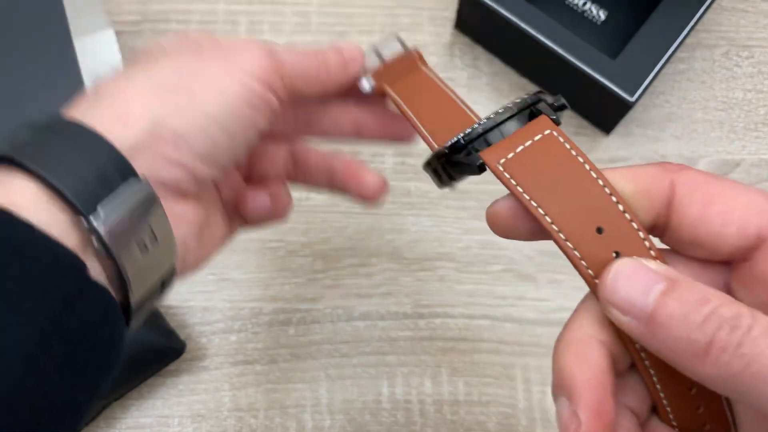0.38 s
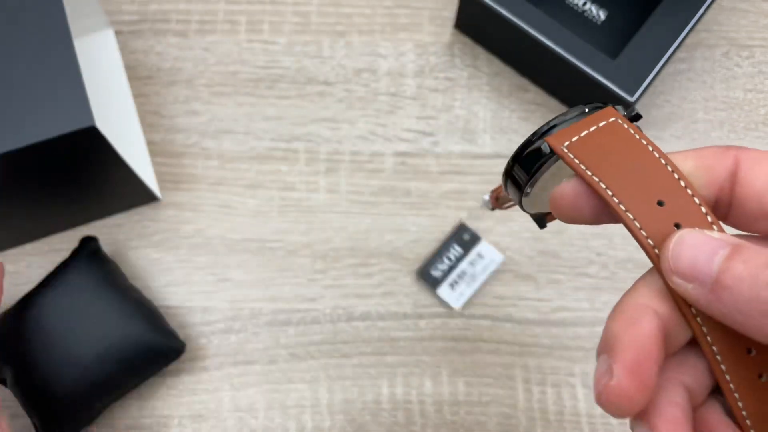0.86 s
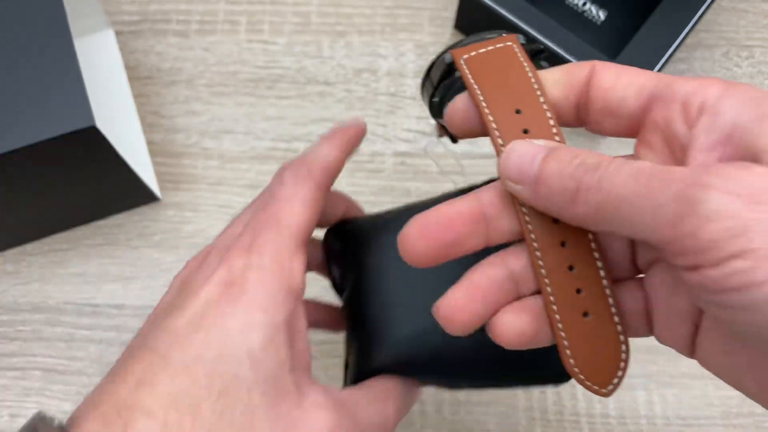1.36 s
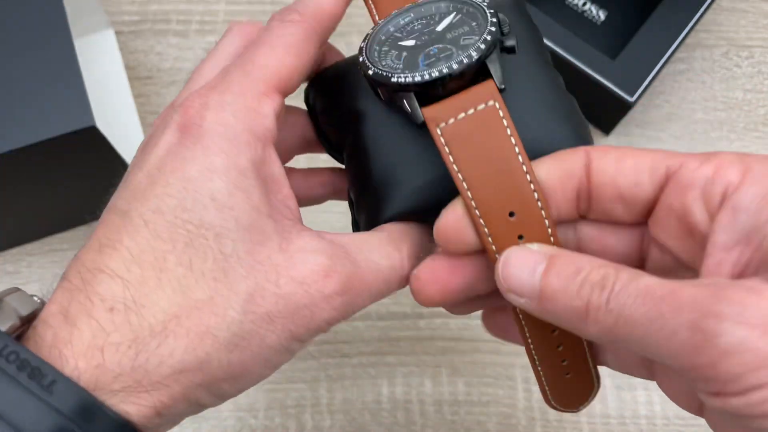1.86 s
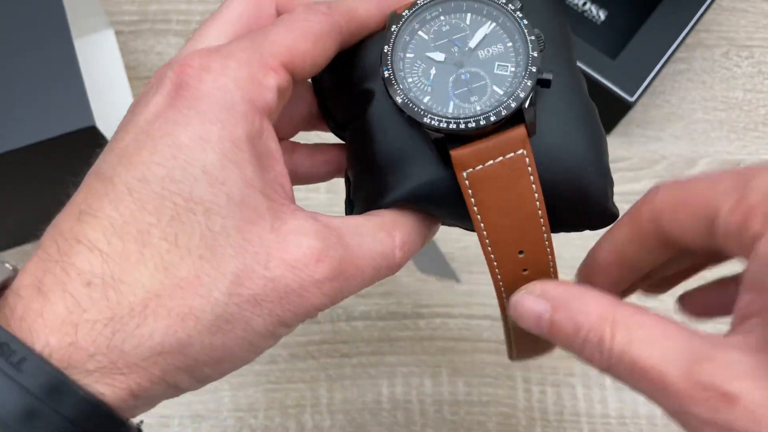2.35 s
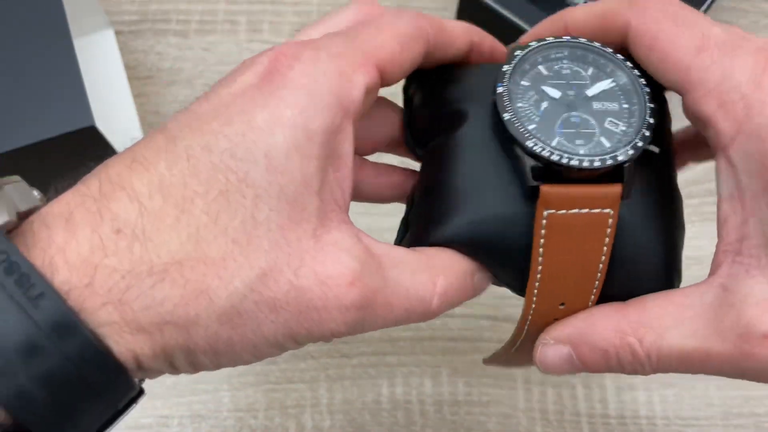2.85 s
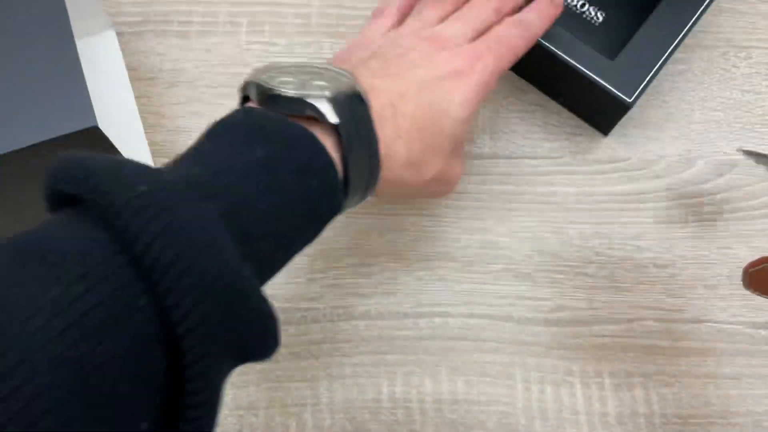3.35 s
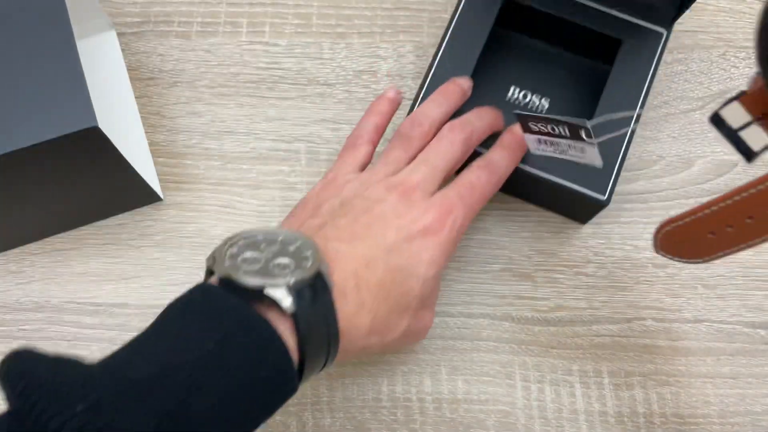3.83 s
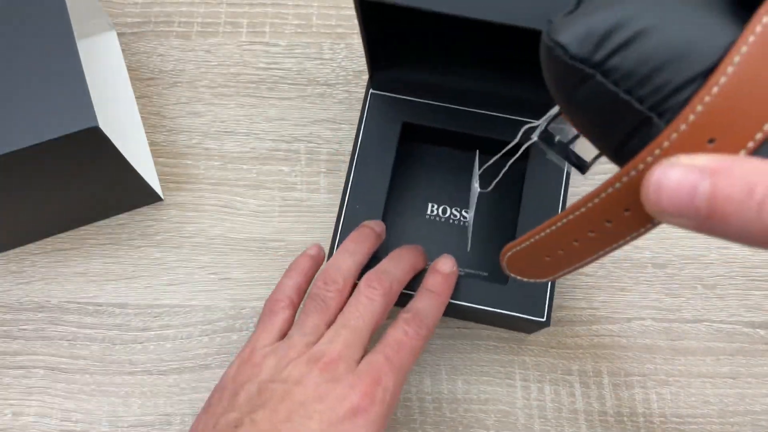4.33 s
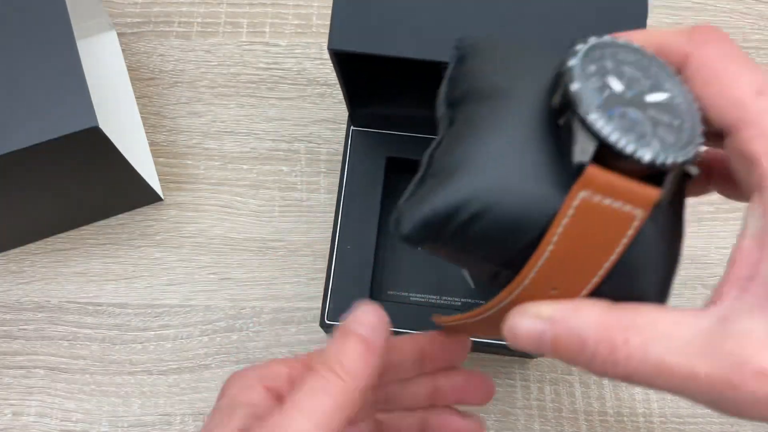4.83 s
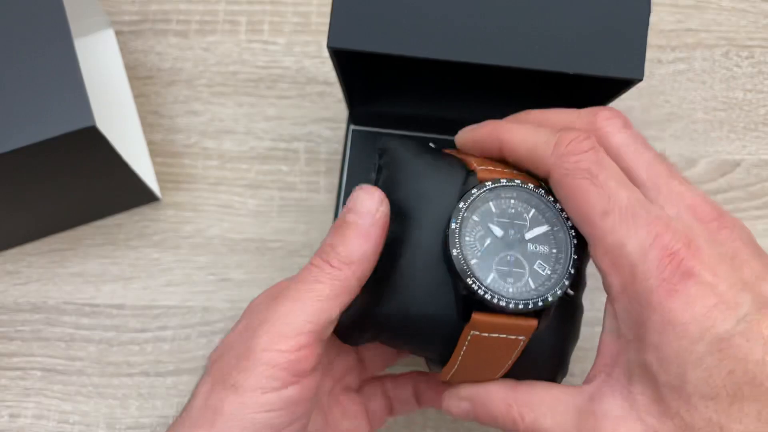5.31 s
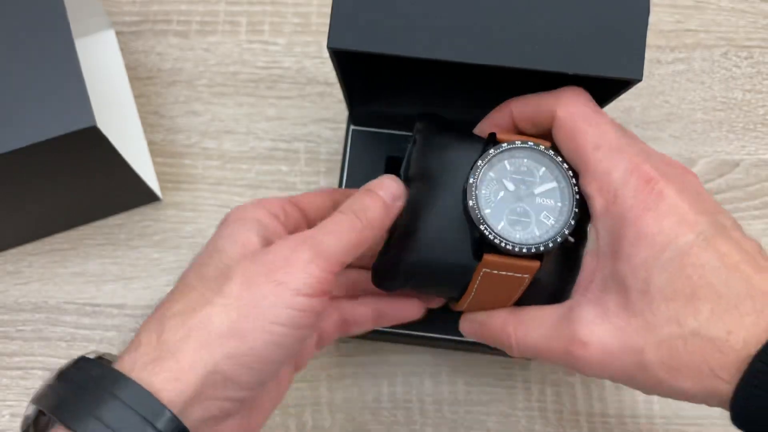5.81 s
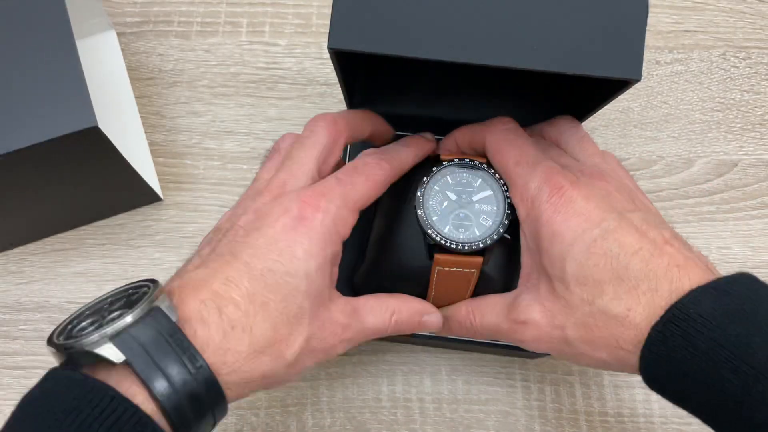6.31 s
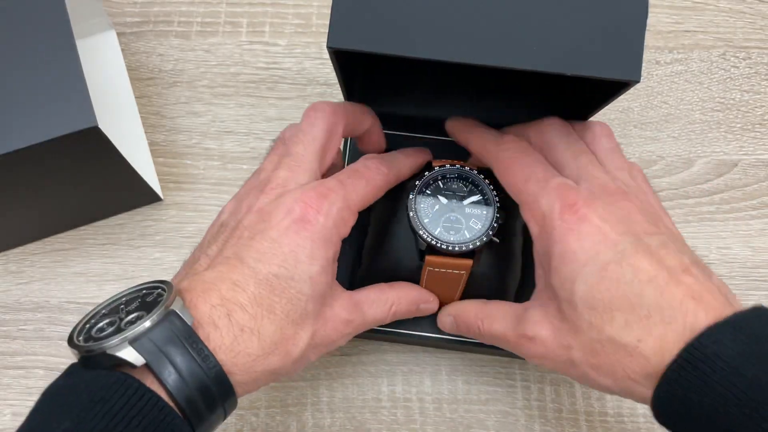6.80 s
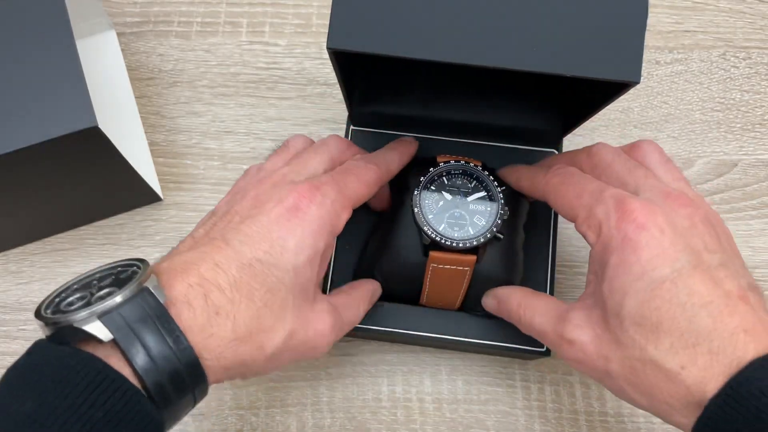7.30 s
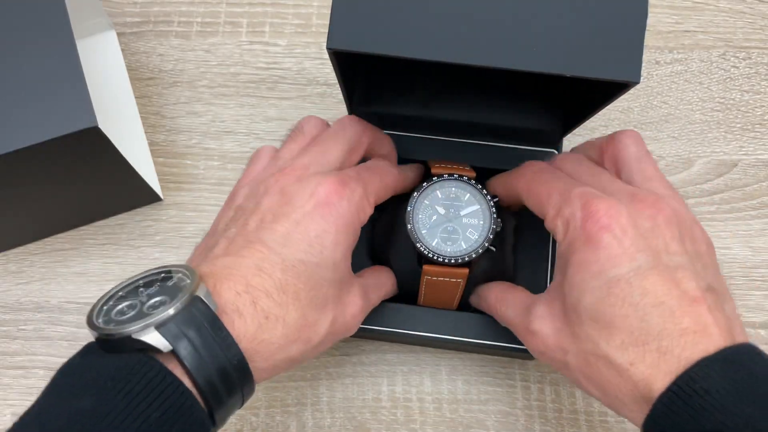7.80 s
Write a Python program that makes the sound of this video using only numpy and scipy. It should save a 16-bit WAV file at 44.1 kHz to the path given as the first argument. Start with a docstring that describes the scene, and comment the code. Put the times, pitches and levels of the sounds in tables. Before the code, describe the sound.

Hands rub a leather strap around a cushion, drag a hollow cardboard box across a wooden table, then press the watch in with scrapes and knocks.

```python
"""Skin hisses on leather, a cardboard box scrapes over a ringing table top, small hard parts tick and the box knocks.
Hands wrap a watch strap round a cushion, drag the box across the wooden table and press the watch into it.
Rubbing is uneven filtered noise; box, table and hard parts are sets of fading tones set going by noise or by blows.
A quiet room hums and reverberates, heard through two microphone ports a little apart."""
import sys
import numpy as np
from scipy import signal
from scipy.fft import rfft, irfft
from scipy.io import wavfile
from scipy.ndimage import uniform_filter1d

SR = 44100
rng = np.random.default_rng(int(sys.argv[2]) if len(sys.argv) > 2 else 0)


def invert_db(level):
    """Linear amplitude ratio for a level in decibels (20 dB per decade), elementwise."""
    return 10 ** (np.asarray(level, dtype=float) / 20)


def to_wav(s):
    """Save 16-bit WAV."""
    ch = np.atleast_2d(s).T  # columns
    pcm = np.round(np.clip(ch, -1, 1) * 32767)  # PCM
    wavfile.write(sys.argv[1], SR, pcm.astype(np.int16))


N = 359856
HZ = np.fft.rfftfreq(N, 1 / SR)
T = np.arange(N) / SR

# strokes of fingers, strap and cushion, levels before tilt and unevenness:
# (time [s], held [s], hiss of skin [dB], scrape of card [dB], brightness [dB])
STROKES = [(0.078, 0.011, -86.5, -79, 11), (0.268, 0.0067, -82, -100, 0), (.46, 0.012, -87, -62.5, -29),
           (.5, 0.12, -78, -90, -18), (.87, 0.047, -63, -66.5, -49), (.95, 0.081, -68, -76, -14),
           (1.08, 0.15, -77.5, -87, 6), (1.298, 0.023, -74, -68.5, 9), (1.471, 0.052, -65.5, -86, 3),
           (1.509, 0.24, -58.5, -80, -12), (1.788, .21, -56.5, -74, -14.5), (2.048, 0.21, -74, -98, -7.5),
           (2.198, 0.074, -57.5, -68.5, -12.5), (2.61, 0.066, -61, -64, -10.5),
           (2.809, 0.064, -67.5, -77, -1), (2.938, 0.044, -67, -70.5, 2), (3.475, 0.0049, -71, -62.5, -15),
           (4.8, 0.11, -90.5, -87, 7.5), (5.032, 0.034, -84.5, -87, -8), (5.09, .04, -75, -96, -8),
           (5.13, 0.021, -76.5, -67.5, -12), (5.235, 0.016, -64.5, -79, -14),
           (5.267, 0.011, -64.5, -57.5, -49), (5.33, 0.1, -75, -68, -54), (5.46, 0.11, -66.5, -87, -18),
           (5.62, 0.16, -77, -77, -5), (5.69, 0.048, -69, -80, -1), (5.718, 0.03, -67, -61.5, -3),
           (5.96, 0.044, -107, -75.5, -21), (6.05, 0.036, -86, -71, -42), (6.141, .08, -72.5, -66.5, -34),
           (6.25, 0.02, -74, -61.5, 0), (6.34, 0.1, -73.5, -72.5, -16), (6.503, 0.025, -63, -56, -8),
           (6.6, 0.06, -67, -61.5, -22), (6.669, 0.088, -59.5, -58, -22), (6.78, 0.088, -65.5, -62, -7),
           (6.928, 0.024, -62.5, -59.5, -5), (7.018, 0.014, -65.5, -63.5, -6),
           (7.099, 0.021, -73.5, -60, -1), (7.16, 0.026, -69.5, -60, -5), (7.25, 0.19, -72.5, -72, 0),
           (7.351, 0.12, -66.5, -59.5, -9), (7.5, 0.076, -69, -64.5, -4), (7.576, 0.048, -57, -56.5, -8),
           (7.77, 0.084, -65.5, -60, -3), (7.838, 0.095, -57, -56, -9), (8.03, 0.038, -62, -56.5, -14),
           (8.069, 0.035, -58, -55, -13), (8.13, .03, -69, -59, -5)]
# tones of the hollow cardboard box: (frequency [Hz], level [dB], time to fade by 60 dB [s])
BOX_MODES = [(323.6, -6.5, 0.038), (425, -4, 0.029), (508, -6, 0.033), (620, -4.5, 0.023),
             (765, -0.5, 0.016), (900, 0, 0.017), (1083, -3, 0.015), (1450, -4, 0.012),
             (1920, -1.5, 0.0051), (2500, -3.5, 0.0054), (3190, -13, 0.0084)]
# tones of the table top, lowest first: (frequency [Hz], level [dB], time to fade by 60 dB [s])
TABLE_MODES = [(60.4, -15, 0.2), (131, -9, 0.3), (212.2, -4, 0.14), (258.7, 0, 0.13)]
# colour of skin on leather, also of the snap of the card: (frequency [Hz], level [dB])
SKIN_COLOUR = [(500, -9), (1200, 0), (2000, 4), (3000, 4), (4500, 0.5), (6000, -2), (8000, 0),
               (11000, -20.5)]
# colour of the sound that differs between the two ports: (frequency [Hz], level [dB])
PORT_DIFFERENCE = [(60, -17), (250, -13), (600, 1), (5000, 0), (7000, -17), (16000, -15)]


def at(table):
    """Read a (Hz, value) table at every frequency, on a logarithmic axis."""
    hz, value = np.transpose(table)
    return np.interp(np.log(HZ + 1), np.log(hz + 1), value)


def colour(x, table):
    """Filter a sound by a (Hz, dB) table."""
    return irfft(rfft(x) * invert_db(at(table)), N)


def unit(x):
    """Scale to rms 1."""
    return x / np.sqrt(np.mean(x ** 2))


def walk(rate):
    """Random levels, one every 1 / rate seconds, joined by slopes; their rms is near 1."""
    k = int(SR / rate)
    levels = np.repeat(rng.standard_normal(N // k + 1), k)
    return unit(uniform_filter1d(levels, k)[:N])


def add(track, s, piece):
    """Mix a piece into a track at time s."""
    i = int(s * SR)
    track[i:i + len(piece)] += piece[:N - i]


def swing(modes, t):
    """One blow sets fading tones going, peak 1; neighbours swing in opposite directions."""
    body = 0
    for k, (hz, db, t60) in enumerate(modes):
        fade = np.exp(-np.log(1000) * t / t60)
        body = body + (-1) ** k * invert_db(db) * np.sin(2 * np.pi * hz * t) * fade
    return body / np.abs(body).max()


def struck(modes, centre_hz, octave_db):
    """Where and how hard a thing is hit favours tones near one pitch; others lose octave_db per octave."""
    return [(hz, db - octave_db * abs(np.log2(hz / centre_hz)), t60) for hz, db, t60 in modes]


def ring(force, modes):
    """A continuing force drives the fading tones."""
    return signal.fftconvolve(force, swing(modes, T[:SR // 2]))[:N]


def friction(grain_db):
    """Sliding is a dense run of tiny slips of unequal size, none huge."""
    size = np.minimum(rng.exponential(size=N), 4)
    return unit(rng.standard_normal(N) * invert_db(grain_db * size))


def hum():
    """Low room rumble that wavers, with a faint tone; only a small share differs between the ports."""
    # colour of the rumble: (frequency [Hz], level [dB])
    hum_colour = [(25, -14.5), (50, 2.5), (90, -1), (140, 0.5), (185, -5), (215, -0.5), (250, -6),
                  (310, -13.5), (500, -24.5), (1000, -32), (2000, -37), (5000, -46), (9000, -39.5),
                  (16000, -57)]
    hum_db, whine_db = -62, -91
    whine_hz, whine_width_hz = 908, 18
    mid, apart = (unit(colour(rng.standard_normal(N), hum_colour)) * invert_db(hum_db) for _ in range(2))
    resonance = 1 / (1 + (2 * (HZ - whine_hz) / whine_width_hz) ** 2)
    whine = irfft(rfft(rng.standard_normal(N)) * resonance, N)
    side = colour(apart, PORT_DIFFERENCE)
    return mid * invert_db(0.76 * walk(6.3)) + invert_db(whine_db) * unit(whine) + side * np.array([[1], [-1]])


def strokes():
    """Each stroke's level in dB below its own peak: a quick rise, a hold, a slower fall."""
    rise_db_per_s, fall_db_per_s = 605, 242
    s, held = np.transpose(STROKES)[:2, :, None]
    t = T[::32]  # coarse steps suffice
    rise = (s - t) * rise_db_per_s
    fall = (t - s - held) * fall_db_per_s
    return -np.maximum(0, np.maximum(rise, fall))


def total(shape_db, db):
    """Overlapping strokes add in power."""
    power = np.sum(invert_db(2 * (shape_db + db[:, None])), axis=0)
    return np.repeat(np.sqrt(power), 32)[:N]


def drag():
    """Scrape level, share of the higher box tones and hiss level as the box slides over the wood."""
    # (time [s], scrape [dB], share of the higher box tones [0-1], hiss against the scrape [dB])
    course = [(3.5, -82, .05, -14.5), (3.57, -53, .05, -16.5), (3.63, -49, 0, -16), (3.78, -42.5, 0.3, -16),
              (3.99, -47.5, .55, -16.5), (4.19, -47, 1, -19), (4.34, -55.5, .9, -19.5),
              (4.45, -57.5, 0.5, -25), (4.58, -55.5, 0.56, -21.5), (4.71, -88, .8, -19)]
    s, db, share, hiss_db = np.transpose(course)
    level = invert_db(np.interp(T, s, db, left=-120, right=-120))
    return level, np.clip(np.interp(T, s, share), 0, 1), level * invert_db(np.interp(T, s, hiss_db))


def patchy(x):
    """Neighbouring bands swell and sink on their own as the contact shifts."""
    # middle of each wandering band [Hz]
    for hz in (900, 1500, 2250, 3410, 4960):
        band_shape = np.exp(-(np.log2((HZ + 1) / hz) / .3) ** 2)
        band = irfft(rfft(x) * band_shape, N)
        x = x + band * (invert_db(2.5 * walk(9)) - 1)
    return x


def rub():
    """Uneven hiss of tiny slips with crackles; each stroke has its own balance of dull and bright."""
    # colour of the airy treble: (frequency [Hz], level [dB])
    airy_colour = [(5000, -45), (7000, 13.5), (9000, -5), (12000, -1), (13500, -14.5), (16000, 2)]
    tilt_db, tilt_per_db = 0.5, 0.41  # upper against lower hiss, growing with brightness
    restless_db = -94.5  # hands never quite still
    drag_bright_db = -15
    crackle_per_s, crackle_db = 39, 2.5  # weakest crackle, against the even slips
    hiss_db, bright_db = np.transpose(STROKES)[[2, 4]]
    shape, dragged = strokes(), drag()[2]

    def level(slope, base_db):
        """Level over time, shifted by slope times the brightness."""
        stroked = total(shape, hiss_db + slope * bright_db + base_db)
        return stroked + invert_db(restless_db) + dragged * invert_db(slope * drag_bright_db + base_db)

    when, size, sign = rng.random((3, N))
    crackle = (when < crackle_per_s / SR) * invert_db(crackle_db + 11 * size) * np.sign(sign - .5)
    slips = friction(grain_db=4.0) * invert_db(1.62 * walk(70)) + crackle
    low = slips * level(-tilt_per_db / 2, -tilt_db / 2)
    high = slips * level(tilt_per_db / 2, tilt_db / 2)
    # the high signal sets the treble; the difference, with its treble turned down, mainly alters the lower part
    dull = colour(colour(low - high, SKIN_COLOUR), [(2000, -8.5), (5000, -13)])
    hiss = patchy(dull + colour(high, SKIN_COLOUR))
    airy = colour(slips * level(1, 0), airy_colour)
    return (hiss + airy) / np.sqrt(np.mean(invert_db(at(SKIN_COLOUR)) ** 2))


def scrape():
    """Sliding card shakes the hollow box and passes a share to the table; the dragged box shakes it more."""
    # the dragged box shaking the table top: (time [s], upper tones [dB], lowest tones [dB])
    load = [(3.45, -99, -81), (3.662, -52, -62), (3.794, -44, -73), (3.948, -47.5, -63), (4.054, -71, -49),
            (4.134, -48, -55), (4.188, -63, -46), (4.478, -69, -62), (4.572, -55, -54), (4.75, -94, -85)]
    stroked = total(strokes(), np.transpose(STROKES)[3])
    dragged, high_share, _ = drag()
    slips = friction(grain_db=0.5) * invert_db(1.6 * walk(80))
    low, high = (unit(ring(slips, struck(BOX_MODES, hz, octave_db=6.0))) for hz in (720, 950))
    stroked_box = stroked * (0.43 * low + 0.57 * high)
    dragged_box = dragged * ((1 - high_share) * low + high_share * high)

    level = stroked + 0.91 * dragged
    s, upper_db, lower_db = np.transpose(load)
    shake = friction(grain_db=1.5) * invert_db(2.5 * walk(30))
    upper = invert_db(np.interp(T, s, upper_db, left=-120, right=-120)) + level * invert_db(-5.0)
    lower = invert_db(np.interp(T, s, lower_db, left=-120, right=-120)) + level * invert_db(-6.5)
    table_top = upper * unit(ring(shake, TABLE_MODES[2:])) + lower * unit(ring(shake, TABLE_MODES[:2]))
    return stroked_box + dragged_box + table_top


def ticks():
    """Buckle, tag and nails give very short rough rings, each over a broad crack of noise."""
    # (time [s], level before roughness [dB], favoured pitch [Hz], crack against the ring [dB])
    hits = [(.268, -47.5, 4000, -4), (.855, -32.5, 2500, -11), (.856, -25, 5000, -11),
            (.8985, -28, 5600, -0.5), (0.97, -49, 3000, -18), (2.365, -56, 3320, 4),
            (2.488, -66.5, 2800, 5), (2.6007, -41.5, 5950, -17), (3.465, -44.5, 2500, -1.5),
            (3.527, -41.5, 5000, 4), (4.59, -47, 3000, -11), (4.889, -50.5, 3420, -9),
            (5.194, -61, 5500, 7), (5.634, -59, 8000, 8.5), (6.141, -56, 4000, -9), (6.655, -28.5, 4000, 2),
            (6.656, -28.5, 2100, -4), (6.669, -46, 5000, 6), (6.724, -46, 9000, 7),
            (6.7642, -40.5, 3000, 1), (7.111, -54, 3300, 1), (7.161, -47, 2600, -9),
            (7.197, -46, 3570, -1.5), (7.653, -33.5, 3560, 1), (7.7415, -39, 3480, -15),
            (7.793, -51.5, 7000, 6), (8.009, -46.5, 4400, -14)]
    # tones of the small hard parts: (frequency [Hz], level [dB], time to fade by 60 dB [s])
    hard_modes = [(2060, 0, 0.0072), (2500, 3, 0.018), (3360, -10.5, 0.006), (4000, 6, 0.0039),
                  (5000, 7, 0.0078), (5620, 9, 0.0025), (9000, 6.5, 0.012), (10930, -52, 0.0017)]
    crack_peak_ms, rise_s = 0.52, 0.00079
    out, t = np.zeros(N), T[:800]
    crack_shape = t * np.exp(-1000 * t / crack_peak_ms)
    crack_shape = crack_shape / crack_shape.max()
    for s, db, hz, crack_db in hits:
        a, b = rng.standard_normal((2, len(t)))
        rough = 0.98 + 1.8 * unit(uniform_filter1d(a, 10))
        tones = rough * np.minimum(t / rise_s, 1) * swing(struck(hard_modes, hz, octave_db=9.0), t)
        crack = (b - .5 * np.roll(b, 1)) * crack_shape
        add(out, s, invert_db(db) * (tones + invert_db(crack_db) * crack) / 2)
    return out


def jingle():
    """Tiny gritty contacts ring a loose metal clasp: some placed ones, and a rattle as it settles."""
    # placed contacts: (time [s], level before roughness [dB], favoured pitch [Hz])
    contacts = [(.4475, -49.5, 1600), (.465, -59, 2900), (.4996, -49, 2920), (.526, -62, 1500),
                (.583, -62, 2900), (.61, -70, 1500), (.64, -67, 1600), (.817, -53, 2400), (.83, -65, 2900)]
    # tones of the clasp: (frequency [Hz], level [dB], time to fade by 60 dB [s])
    clasp_modes = [(800, 2, 0.024), (1474, 2, 0.082), (1600, 4.5, 0.018), (2897, 1.5, 0.022),
                   (3070, -7, 0.024), (4400, -4.5, 0.012), (5050, -4.5, 0.012)]
    out, t = np.zeros(N), T[:3000]
    a, b, c = rng.random((14, 3)).T
    rattle_s = np.interp(a, (0, 1), (0.48, 0.63))
    rattle_db = -66.5 + 8 * (b - .5)
    rattle_hz = np.interp(c, (0, 1), (4000, 8000))
    for s, db, hz in [*contacts, *zip(rattle_s, rattle_db, rattle_hz)]:
        grit = rng.standard_normal(len(t))
        rough = 1 + 0.47 * unit(uniform_filter1d(grit, 80))
        contact = 0.2 * uniform_filter1d(grit, 3) * np.exp(-t / 0.0014)
        add(out, s, invert_db(db) * (rough * swing(struck(clasp_modes, hz, octave_db=7.5), t) + contact))
    return out


def taps():
    """Each blow rings the box and the table top, with a short snap of the card on top."""
    # (time [s], peak of the box tones [dB], favoured pitch [Hz], table against box [dB], snap against box [dB])
    blows = [(1.3002, -48.5, 1150, -23, 4.5), (3.559, -43.5, 704, -16, -12), (3.605, -37, 800, -11, -23),
             (4.862, -68, 900, -10, -3), (5.019, -59, 655, -0.5, -13), (5.123, -52, 900, -22, -1.5),
             (5.152, -56, 990, -4.5, -19), (5.261, -28.5, 1600, -43, -4), (5.277, -42, 1020, -13, -8),
             (6.235, -43, 900, -22, -1.5), (6.325, -53.5, 686, 0.5, -7), (6.501, -50, 1030, -26, -6),
             (6.520, -36, 1070, -13.5, -3.5), (6.687, -26.5, 620, -9.5, -11), (7.556, -43.5, 900, -29, -5),
             (7.735, -46.5, 900, -6.5, -11), (7.822, -37, 590, -23, -4), (7.828, -25, 350, -7, -10),
             (7.864, -39, 454, -4, -21), (8.111, -34.5, 930, -9, -12)]
    body, snap, t = np.zeros(N), np.zeros(N), T[:SR // 4]
    for s, db, hz, table_db, snap_db in blows:
        grit = rng.standard_normal(400)
        add(body, s, invert_db(db) * swing(struck(BOX_MODES, hz, octave_db=10.0), t))
        add(body, s, invert_db(db + table_db) * swing(TABLE_MODES, t))
        add(snap, s, invert_db(db + snap_db) * grit * np.exp(-t[:400] / .0008))
    return body + colour(snap, SKIN_COLOUR)


def press():
    """Hands leaning on the box send a deep rumble, made of low noise, through the table."""
    # (time [s], level [dB])
    leaning = [(6.2, -67.5), (6.504, -65), (6.56, -54.5), (6.756, -58.5), (6.904, -67.5), (7.28, -63),
               (7.536, -83), (7.624, -60), (7.744, -63.5), (7.848, -52.5), (8.16, -61.5)]
    s, db = np.transpose(leaning)
    deep = colour(rng.standard_normal(N), [(15, -4), (35, -9.0), (75, 5.0), (130, -16), (300, -61)])
    return unit(deep) * invert_db(np.interp(T, s, db, left=-120))


def room(x):
    """Scattered reflections die away; the ports hear them differently in the middle of the range."""
    # colour of the reverberation: (frequency [Hz], level [dB])
    room_colour = [(100, 6), (500, -0.5), (2000, -7), (6000, -1), (14000, -3.5)]
    t60_s, room_db = 0.31, -6
    t = T[:SR // 2]
    fade = np.exp(-np.log(1000) * t / t60_s) * np.clip(t / 0.0013, 0, 1)
    shared, apart = rng.standard_normal((2, len(t))) * fade
    wet = colour(x, room_colour) * invert_db(room_db) / np.sqrt(np.sum(shared ** 2))
    side = colour(signal.fftconvolve(wet, apart)[:N], PORT_DIFFERENCE)
    return signal.fftconvolve(wet, shared)[:N] + side * np.array([[1], [-1]])


def scene():
    """All contacts, close and through the room, over the hum."""
    near = rub() + scrape() + ticks() + jingle() + taps() + press()
    return near + room(near) + hum()


def roll_off(x):
    """The treble ends steeply here."""
    return signal.sosfilt(signal.butter(12, 16510, fs=SR, output="sos"), x)


def record(dry):
    """The two channels differ in level and in phase; the treble phase falls as pitch rises, so some bands
    arrive nearly opposite."""
    # first channel against second: (frequency [Hz], phase [rad])
    channel_phase = [(20, -.15), (1500, -.15), (3200, .7), (4500, .2), (5400, 0), (6700, -3), (7900, -3.2),
                     (9200, -4.7), (10300, -6.2), (11800, -6.4), (12700, -7.5), (13500, -9.3), (16000, -9.5)]
    # first channel against second: (frequency [Hz], level [dB])
    channel_balance = [(60, 1.5), (300, 2.7), (1000, 2), (1900, 1), (3200, 3), (5700, 4), (7000, 0),
                       (16000, 0)]
    half = np.array([[.5], [-.5]])  # each channel takes half of the difference
    ports = invert_db(half * at(channel_balance)) * np.exp(1j * half * at(channel_phase))
    mix = irfft(rfft(dry) * ports, N)
    return roll_off(mix)


dry = scene()
out = record(dry)
to_wav(out)
```